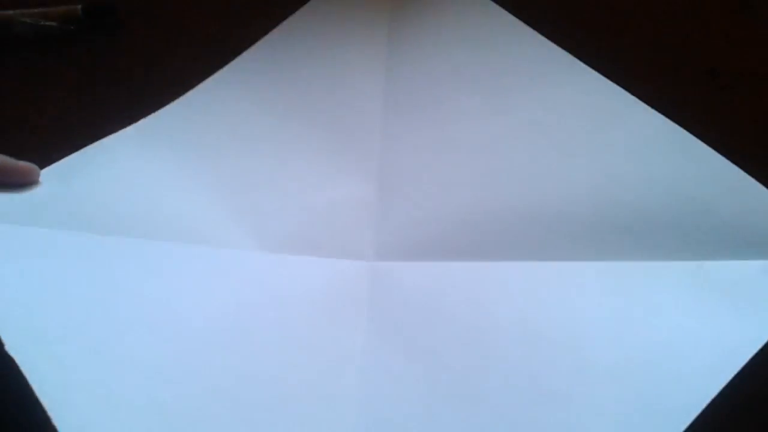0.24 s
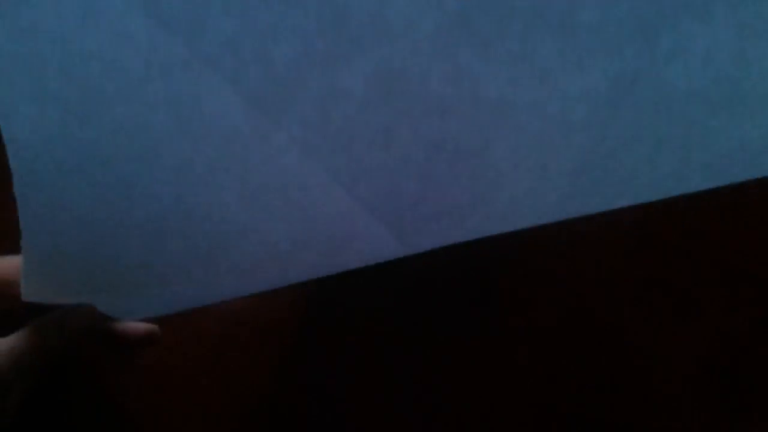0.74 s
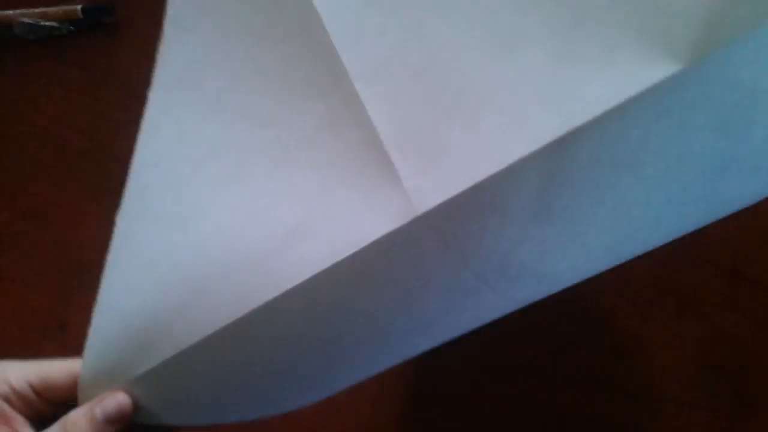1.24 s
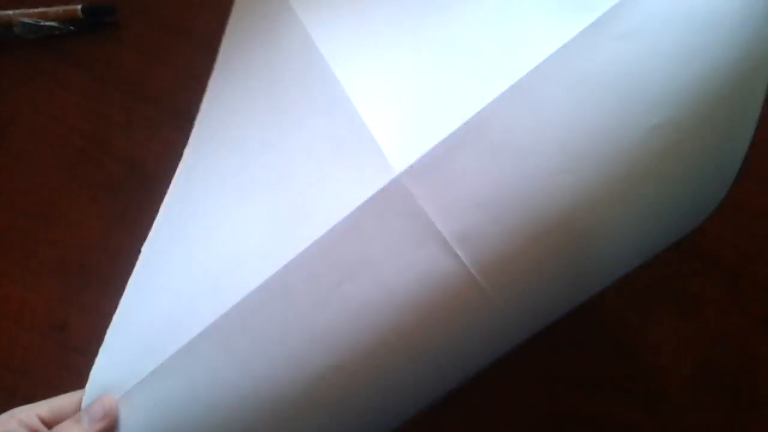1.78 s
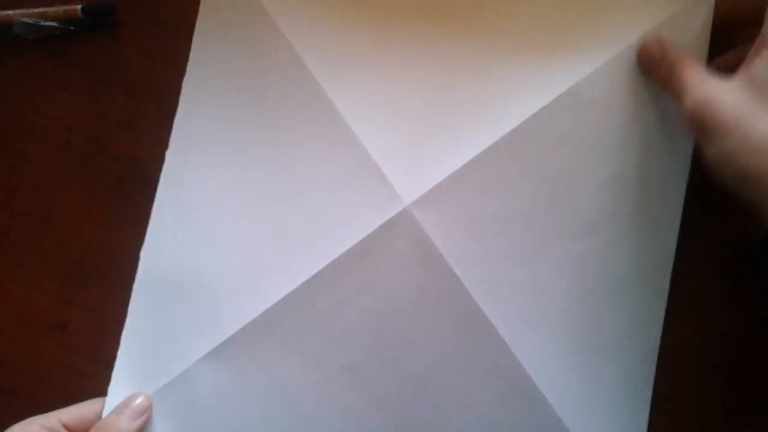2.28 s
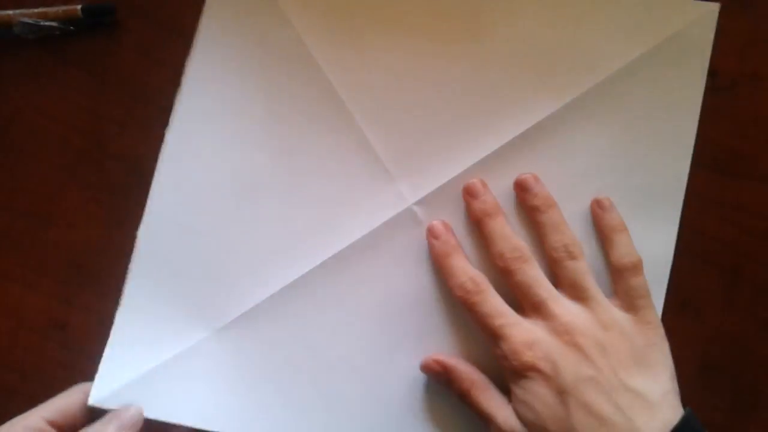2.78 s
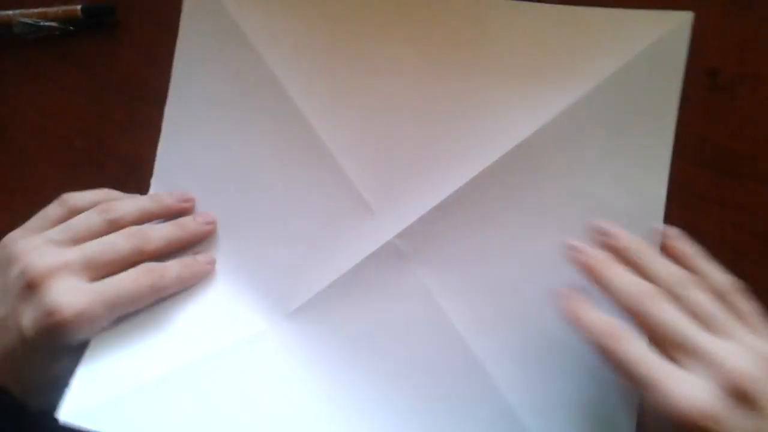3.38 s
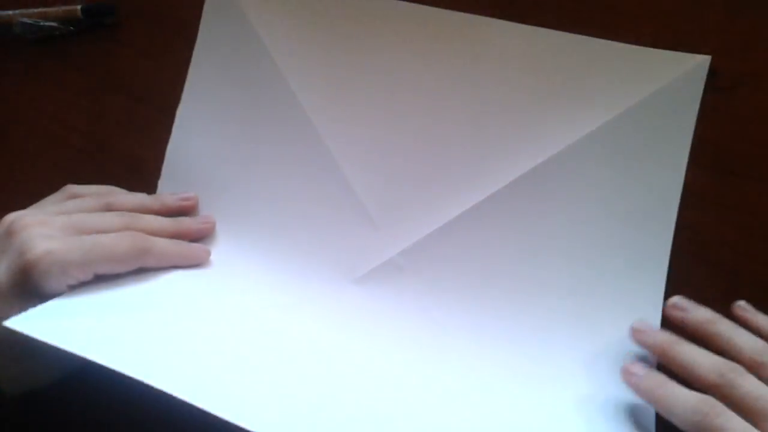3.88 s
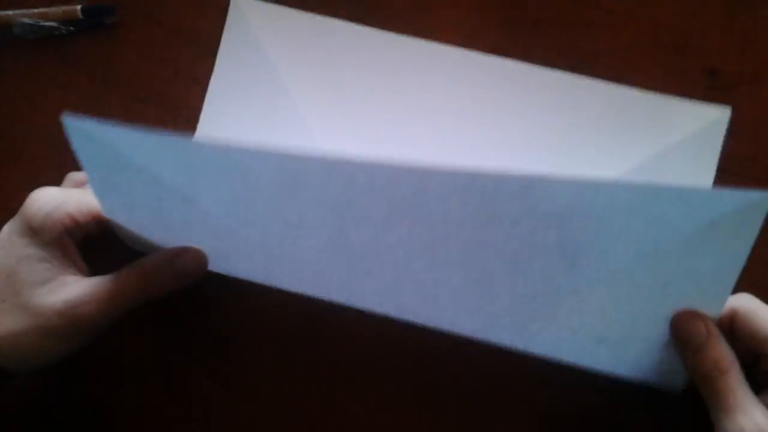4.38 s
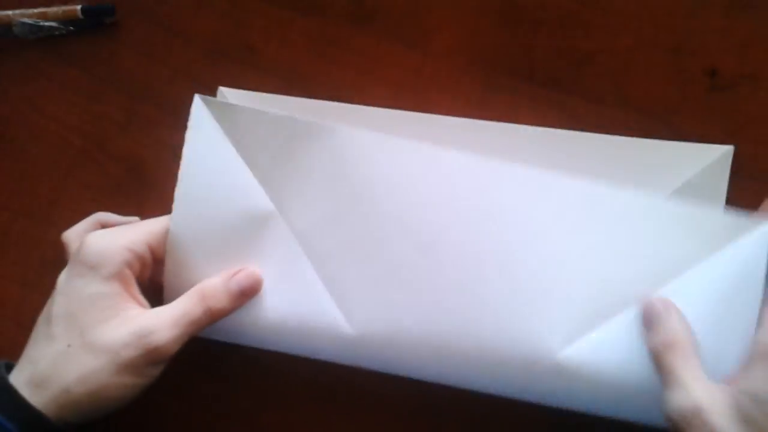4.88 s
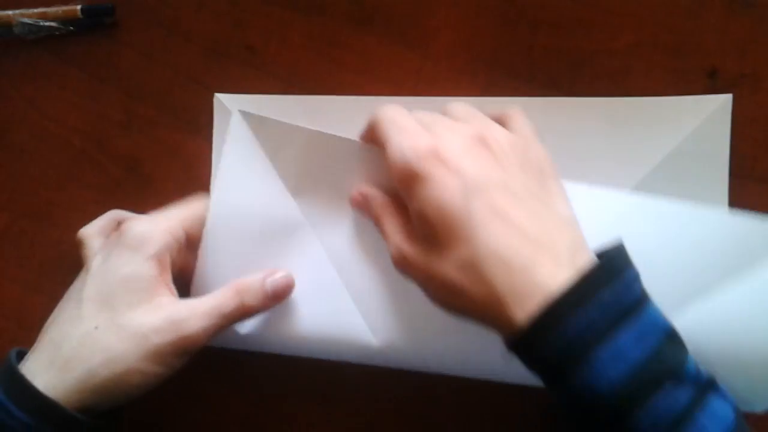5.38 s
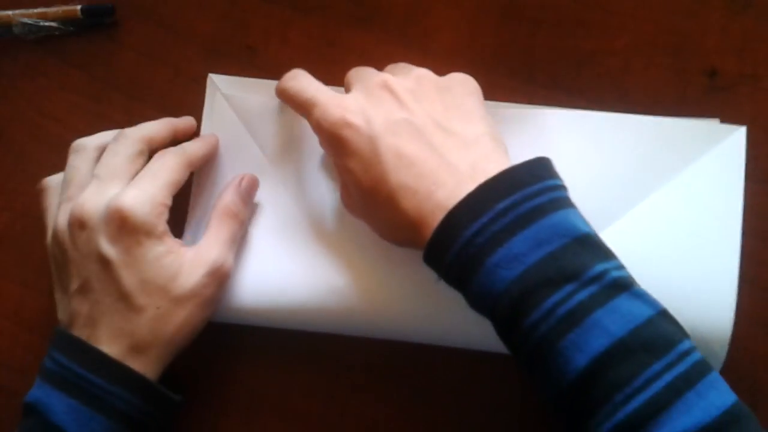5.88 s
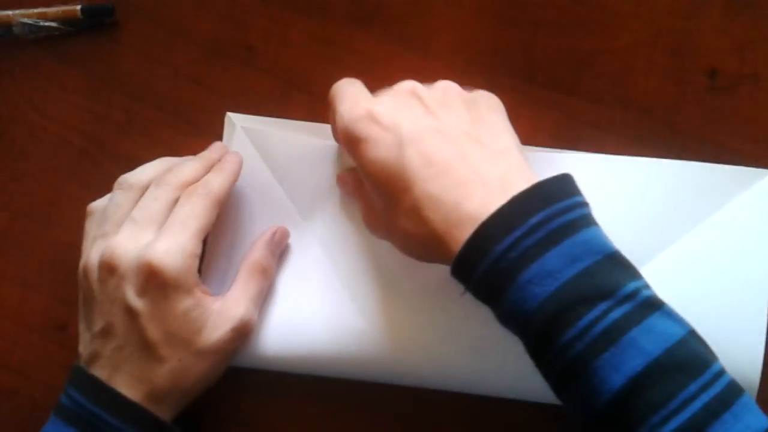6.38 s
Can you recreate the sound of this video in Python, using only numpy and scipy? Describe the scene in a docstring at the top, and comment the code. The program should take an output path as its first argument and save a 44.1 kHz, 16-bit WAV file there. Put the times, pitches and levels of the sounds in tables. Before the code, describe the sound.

In a small, quiet room, a faint mains hum and soft fan noise with a thin whine run throughout. Close to a small microphone, paper slides briefly at the start, with a light pop and rustle around 0.3-0.4 s, then faint brushing and a small tick at 1.5 s. At 1.7-1.95 s the turned sheet settles in a crackling flap with low puffs of air. After a soft slide near 2.2 s and a lull, crisp clicks come at 2.65 s and a sharp pop at 2.9 s, followed by smoothing hisses to 3.4 s. A gentle slide and tick pass around 3.9-4.0 s, a duller pop at 4.15 s. The fold swishes over at 4.7 s, bursting into dense hollow crackles at 4.85-5.0 s. Bright, hard creasing snaps strike at 5.42-5.48 s and 6.03 s, among strong rubbing strokes and fingertip hisses continuing to 6.6 s.

```python
"""A mains hum and a faint fan fill a small, quiet room, with the soft hiss of paper sliding under a hand.
A sheet is turned over, smoothed flat and folded on a wooden table, close to a small microphone.
Snaps are falling tones and clicks shaped by the paper panel; flaps are swelling bursts of clicks.
Slides are dense streams of tiny clicks, drags are narrow gliding hisses, and puffs are low swings of air."""
import sys
import numpy as np
from scipy import signal
from scipy.fft import rfft, irfft, next_fast_len
from scipy.io import wavfile
from scipy.ndimage import uniform_filter1d, map_coordinates

SR = 44100
rng = np.random.default_rng(int(sys.argv[2]) if len(sys.argv) > 2 else 0)


def log_audio(samples):
    """Write samples as a 16-bit WAV file to the path given in sys.argv[1]."""
    # one column per channel
    frames = np.atleast_2d(samples).T
    # limit to full scale, then quantise
    limited = np.clip(frames, -1, 1)
    pcm = np.round(limited * 32767).astype(np.int16)
    wavfile.write(sys.argv[1], SR, pcm)


N = 292806
T = np.arange(N) / SR  # time in seconds
MS = T * 1000  # time in milliseconds

SNAP_RISE_MS = 0.55
FLAP_SWELL_SHARE = 0.34  # part of a flap's listed length spent swelling; the rest sets its fade
FLAP_LOW_SHARE = 0.59  # low corner of a flap, as a share of its resonance
FLAP_CRACKLE_DB, FLAP_CRACKLES_PER_S = -1.5, 600  # separate crackles that stand out of a flap's rustle
STROKE_ROUNDNESS = 1.35  # 1 gives a pointed stroke, 2 a bell
RUSTLE_PER_PRESS = 2.25  # dB of rustle that the hand damps for each dB of pressure
# light brushing between the strokes: louder once the fold lays paper on paper, silent while the sheet lies still
BRUSH_OPEN_DB, BRUSH_FOLDED_DB, BRUSH_WANDER_DB = -62, -57.5, 1.5
FOLDED_S = 4.48
STILL_FROM_S, STILL_TO_S = 2.05, 2.61
DRAG_WIDTH_SHARE = 0.19  # width of a drag's first filter, as a share of its pitch
TABLE_ECHO_MS, TABLE_ECHO_SCATTER_MS, TABLE_ECHO_DB = 1.9, 0.17, -9.5  # the tabletop mirrors each snap


def undb(db):
    """Turn decibels into a gain."""
    return 10 ** (np.asarray(db) / 20)


def unit(x):
    """Scale a signal to an rms level of 1."""
    return x / np.sqrt(np.mean(x ** 2))


def walk(rate):
    """Wander at random: levels held for 1 / rate seconds, smoothed twice and scaled to rms 1."""
    hold = max(int(SR / rate), 2)
    steps = np.repeat(rng.standard_normal(N // hold + 1), hold)
    smooth = uniform_filter1d(uniform_filter1d(steps, hold), hold)
    return unit(smooth[:N])


def colour(x, points):
    """Filter a sound with a gain that runs through (Hz, dB) points, without any sound ahead of its cause."""
    size = 2 * next_fast_len(len(x))
    hz, db = np.transpose(points)
    bins_hz = np.maximum(np.arange(size // 2 + 1) * SR / size, 1)
    gain = undb(np.interp(np.log(bins_hz), np.log(hz), db))
    # folding the cepstrum onto positive times makes the filter causal
    cepstrum = irfft(np.log(gain))
    cepstrum[1:size // 2] *= 2
    cepstrum[size // 2 + 1:] = 0
    response = np.exp(rfft(cepstrum))
    return irfft(rfft(x, size) * response)[:len(x)]


def even(x, width_hz=500):
    """Level out the broad humps in the spectrum of a burst, so that it excites all pitches alike."""
    power = uniform_filter1d(np.abs(rfft(x, SR)) ** 2, size=int(width_hz))  # one bin per Hz
    hz = np.arange(50, 9000, 50)
    return colour(x, np.column_stack([hz, -10 * np.log10(power[hz] / power[hz].mean())]))


def add(out, s, x):
    """Mix x into out from time s, in seconds."""
    i = int(s * SR)
    out[i:i + len(x)] += x[:len(out) - i]


def swell(ms, rise_ms, fade_ms):
    """Rise in a straight line, then fade exponentially."""
    rise = np.minimum(ms / max(rise_ms, .1), 1)
    return rise * np.exp(-np.maximum(ms - rise_ms, 0) / max(fade_ms, .5))


def grains(count, rate, spread_db):
    """Tiny slips of fibres: random clicks, about `rate` a second, a few much larger than the rest."""
    size = undb(spread_db * np.minimum(rng.exponential(size=count), 5))
    sign = rng.choice([-1., 1.], count)
    return unit(sign * size * (rng.random(count) < rate / SR))


def background(waver=0.028, whine_drift=0.93):
    """Mains harmonics hum with a slight waver; a fan adds soft air noise and a thin, unsteady whine."""
    # colour of the fan's air noise: (pitch_hz, gain_db)
    fan_colour = [(20, -51.5), (35, -31.5), (55, -12), (90, -3), (125, 0), (160, -1.5), (220, 3),
                  (330, 0.5), (700, -2.5), (1200, -3.5), (2000, -9), (3500, -12), (6500, -14.5),
                  (8000, -47.5)]
    fan_db = -60  # rms level of the air noise
    # steady tones of the mains hum: (pitch_hz, about the rms level_db)
    hum_tones = [(100, -76), (120, -73.5), (200, -71.5), (300, -72.5), (400, -74), (500.3, -57),
                 (600.3, -60.5), (700, -75), (800, -76.5)]
    # whining tones of the fan: (pitch_hz, rms level_db)
    whine_tones = [(1136, -69.5), (1378, -71.5), (1674, -78)]
    out = undb(fan_db) * unit(colour(rng.standard_normal(N), fan_colour))
    for hz, db in hum_tones:
        level = np.sqrt(2) * undb(db) * (1 + waver * walk(3.5))
        out += level * np.sin(2 * np.pi * (hz * T + rng.random()))
    for hz, db in whine_tones:
        out += np.sqrt(2) * undb(db) * np.sin(2 * np.pi * hz * T + whine_drift * walk(22))
    return out


def room(x, wet_db=-10.0, t60_s=0.3, treble_t60_s=0.18, gap_s=0.0051, split_hz=2500):
    """Near walls answer after a few milliseconds; the treble dies a little sooner."""
    t = T[:SR // 2]
    echoes = grains(len(t), 12000, 2.3) * (t > gap_s)
    low = signal.sosfilt(signal.butter(2, split_hz, fs=SR, output="sos"), echoes)
    high = signal.sosfilt(signal.butter(2, split_hz, "high", fs=SR, output="sos"), echoes)
    # subtracting keeps the two bands from cancelling where they meet
    tail = even(low * 1e-3 ** (t / t60_s) - high * 1e-3 ** (t / treble_t60_s), width_hz=250)
    return x + undb(wet_db) * signal.fftconvolve(x, tail / np.linalg.norm(tail))[:N]


def puffs():
    """Air pushed out from under the moving sheet: a soft swing or two of pressure as the sheet settles."""
    # (middle_s, level_db, pitch_hz, length_ms)
    air_pushes = [(1.692, -42.5, 85, 4.2), (1.809, -47, 100, 6.8), (1.755, -55, 89.5, 6),
                  (1.91, -56, 70.4, 7.1), (2.034, -56, 68, 6.2), (5.744, -49.5, 117, 10)]
    out = np.zeros(N)
    for s, db, hz, length_ms in air_pushes:
        age_ms = (T - s) * 1000
        out -= undb(db) * np.sin(2 * np.pi * hz * (T - s)) * np.exp(-(age_ms / length_ms) ** 2 / 2)
    return out


def motion():
    """Sliding speed and pressure: every stroke speeds up and slows down, over a light, wandering brushing."""
    # a hand or the sheet slides: (time of greatest speed_s, level_db, speeding_up_s, slowing_down_s, pressure_db)
    strokes = [(0.0, -57, 0.057, 0.022, -1), (0.15, -74, 0.012, 0.013, -1), (0.36, -49.5, 0.087, 0.034, 2),
               (0.455, -55, 0.032, 0.025, -0.5), (0.78, -57.5, 0.047, 0.071, -1),
               (0.879, -56, 0.034, 0.043, 0.5), (1.19, -54.5, 0.064, 0.047, 0.5),
               (1.34, -62, 0.022, 0.024, -3), (1.765, -48.5, 0.12, 0.046, 2), (2.222, -52, 0.091, 0.032, 0),
               (2.655, -48, 0.044, 0.037, -1.5), (2.85, -55, 0.17, 0.13, 4), (2.995, -51.5, 0.018, 0.1, 5),
               (3.159, -49.5, 0.067, 0.079, 2.5), (3.281, -47, 0.024, 0.036, 0.5),
               (3.42, -56.5, 0.064, 0.017, -0.5), (3.917, -49.5, 0.12, 0.14, 0.6),
               (4.311, -55.5, 0.1, 0.093, 4.5), (4.701, -47, 0.13, 0.084, 0),
               (4.836, -51, 0.0082, 0.065, -1), (5.035, -46, 0.016, 0.045, -0.5),
               (5.1, -51, 0.031, 0.036, 0), (5.213, -51.5, 0.01, 0.032, -2),
               (5.305, -52.5, 0.021, 0.028, -2.5), (5.43, -45.5, 0.088, 0.082, -2.5),
               (5.62, -52.5, 0.041, 0.033, -2.5), (5.771, -48.5, 0.2, 0.075, 1.5),
               (5.928, -59, 0.071, 0.02, -5.5), (6.08, -45, 0.08, 0.095, 0),
               (6.273, -46, 0.034, 0.045, 1.5), (6.385, -51.5, 0.086, 0.089, 1.5),
               (6.49, -52.5, 0.033, 0.039, 1), (6.612, -49.5, 0.08, 0.043, 0.5)]
    moving = uniform_filter1d(1. * ((T < STILL_FROM_S) | (T > STILL_TO_S)), size=SR // 20)
    brush_db = uniform_filter1d(np.where(T < FOLDED_S, 1. * BRUSH_OPEN_DB, BRUSH_FOLDED_DB), size=SR // 5)
    power = (moving * undb(brush_db + BRUSH_WANDER_DB * walk(14))) ** 2
    pressed = np.zeros(N)
    for s, db, rise_s, fall_s, press_db in strokes:
        away = np.maximum((s - T) / rise_s, (T - s) / fall_s)
        near = away < 5
        stroke = (undb(db) * np.exp(-away[near] ** STROKE_ROUNDNESS)) ** 2
        power[near] += stroke
        pressed[near] += press_db * stroke
    # the stronger a stroke is at a moment, the more its pressure counts
    return np.sqrt(power), pressed / (power + 1e-18)


def sliding(hiss_db=-0.5, rustle_db=-3.0, catch_db=2.1, shift_db=-2.36, split_hz=4500):
    """Fibres catch and slip in a dense stream, as loud as the sliding is fast."""
    # colour of the fine hiss: (pitch_hz, gain_db)
    hiss_colour = [(300, -28), (1000, -23.5), (2000, 1.5), (3300, 5), (5300, 3.5), (6500, 2.5), (7300, -3),
                   (7900, -30.5)]
    # colour of the coarse rustle: (pitch_hz, gain_db)
    rustle_colour = [(120, -30), (300, -3), (600, -5.5), (900, 2.5), (1500, 3.5), (2200, -7), (4000, -22.5),
                     (8000, -20.5)]
    speed, press_db = motion()
    grip = undb(catch_db * walk(55))
    fine = unit(colour(grains(N, 14000, 2.6), hiss_colour))
    coarse = unit(colour(grains(N, 4000, 1.7), rustle_colour))
    # a pressing fingertip hisses brighter than a loose palm, and the patch of contact keeps shifting
    dull = signal.sosfiltfilt(signal.butter(2, split_hz, fs=SR, output="sos"), fine)
    bright = undb(0.72 * press_db + shift_db * walk(22.03))
    fine = unit(dull / bright + (fine - dull) * bright)
    # pressure also keeps the rest of the sheet from rustling
    rustle_gain = undb(rustle_db - RUSTLE_PER_PRESS * press_db)
    return grip * speed * (undb(hiss_db) * fine + rustle_gain * coarse)


def drags():
    """Skin sticks and slips on the sheet: a narrow hiss whose pitch glides as the fingertip rolls."""
    # (time of greatest speed_s, level_db, pitch_hz, half_length_s, glide_octaves)
    finger_drags = [(1.807, -42.5, 3840, 0.0095, -0.42), (2.831, -53, 3500, 0.052, -0.45),
                    (2.997, -55, 3330, 0.019, 0.1), (3.15, -56, 5070, 0.056, 0.17),
                    (3.797, -60, 3460, 0.051, 0.0024), (6.276, -50.5, 5330, 0.023, 0.1),
                    (6.39, -52, 5360, 0.042, 0.15), (6.615, -53, 4540, 0.014, -0.028)]
    out, slips = np.zeros(N), grains(N, 14000, 1.3)
    for s, db, hz, half_s, octaves in finger_drags:
        hiss = signal.lfilter(*signal.iirpeak(hz, 1 / DRAG_WIDTH_SHARE, fs=SR), slips)
        hiss = signal.lfilter(*signal.iirpeak(hz, 1, fs=SR), hiss)
        along = (T - s) / half_s
        # reading the hiss faster or slower bends its pitch
        read_at = np.cumsum(2 ** (octaves * np.tanh(along) / 2))
        hiss = map_coordinates(hiss, [read_at], order=1, mode="mirror")
        out += undb(db) * unit(hiss) * np.exp(-along ** 2 / 2)
    return out


def radiate(push, db, low_hz, high_hz, panel_hz, panel_db, steepness=2.9, width=0.087, leak_db=-30):
    """Panel size sets the lowest pitch and the resonance, the softness of the contact the highest pitch."""
    # colour of the whole sheet: (pitch_hz, gain_db)
    sheet_colour = [(30, -35.5), (130, 1.5), (300, 1), (700, -0.5), (1500, -0.5), (3000, -1), (5500, 0),
                    (6700, -5.5), (7900, -22.5)]
    hz = np.geomspace(30, 9000, num=200)
    sheet_hz, sheet_db = np.transpose(sheet_colour)
    band = 1 / np.sqrt((1 + (low_hz / hz) ** steepness) * (1 + (hz / high_hz) ** 4))
    resonance_db = panel_db / (1 + (np.log(hz / panel_hz) / width) ** 2 / 2)
    # the rest of the sheet answers faintly at every pitch
    band_db = 20 * np.log10(np.hypot(band, undb(leak_db)))
    shape_db = np.interp(np.log(hz), np.log(sheet_hz), sheet_db) + band_db + resonance_db
    sound = colour(push, np.column_stack([hz, shape_db]))
    # the level is that of the whole energy spread over 10 ms
    return undb(db) * sound / np.sqrt(np.sum(sound ** 2) / (SR / 100))


def flaps():
    """The sheet flaps, crumples or lands: many small buckles and contacts swell quickly and die away."""
    # (start_s, level_db, panel_resonance_hz, high_corner_hz, length_ms)
    flap_events = [(0.295, -41, 790, 1280, 95), (1.794, -46.5, 800, 1100, 39), (1.83, -39, 1040, 1400, 26),
                   (1.856, -30.5, 1080, 2500, 14), (1.889, -40, 1150, 3600, 12),
                   (1.917, -44, 1110, 1190, 10), (1.942, -44, 1060, 1000, 25),
                   (2.653, -38.5, 2310, 3880, 30), (2.895, -45, 1500, 3800, 25),
                   (3.235, -45, 1210, 2400, 50), (3.422, -44, 940, 2480, 36), (4.37, -50.5, 1010, 1890, 21),
                   (4.641, -44.5, 1300, 8000, 29), (4.837, -37.5, 1100, 1700, 29),
                   (4.862, -34, 1010, 2700, 30), (4.895, -40.5, 704, 2510, 26),
                   (4.919, -39.5, 960, 5340, 26), (4.96, -35, 1000, 1660, 32),
                   (5.16, -39.5, 940, 1210, 13.5), (5.429, -38, 2900, 5470, 42),
                   (5.43, -46.5, 695, 1800, 15), (5.647, -37.5, 1200, 1440, 47),
                   (6.04, -43, 1200, 1690, 44)]
    out, ms = np.zeros(N), MS[:SR // 4]
    for s, db, panel_hz, high_hz, length_ms in flap_events:
        rise_ms = FLAP_SWELL_SHARE * length_ms
        rustle = grains(len(ms), 14000, 0.55)
        contacts = rustle + undb(FLAP_CRACKLE_DB) * grains(len(ms), FLAP_CRACKLES_PER_S, 1.5)
        push = even(contacts * swell(ms, rise_ms, length_ms - rise_ms))
        low_hz = FLAP_LOW_SHARE * panel_hz
        add(out, s, radiate(push, db, low_hz, high_hz, panel_hz, panel_db=11.5, width=0.31))
    return out


def off_table(x):
    """The wood under the lifted sheet returns each snap at once and colours it; each panel has its own height."""
    lag_ms = TABLE_ECHO_MS + TABLE_ECHO_SCATTER_MS * rng.standard_normal()
    lag = max(int(lag_ms / 1000 * SR), 1)
    echo = undb(TABLE_ECHO_DB)
    return (x + echo * np.pad(x, (lag, 0))[:len(x)]) / np.hypot(1, echo)


def snaps(ripple=4.5, glide_ms=0.776, start_hz=7000, bend_hz=900):
    """A panel pops through; bending waves arrive treble first, then ripple between its creases."""
    # the sheet buckles:
    # (start_s, level_db, low_corner_hz, high_corner_hz, panel_resonance_hz, resonance_height_db, ring_ms)
    buckles = [(0.2955, -50, 650, 1800, 950, 11, 3.4), (0.3701, -39.5, 480, 1770, 740, 12, 3.9),
               (1.5, -44, 3000, 3500, 3200, 12, 2.2), (1.501, -43, 360, 1690, 410, 8, 3.1),
               (1.813, -41.5, 2870, 3400, 3070, 15, 2.9), (1.859, -35, 1100, 3300, 1700, 4, 6.2),
               (1.865, -28.5, 900, 2300, 1870, 8, 3.4), (1.875, -34.5, 330, 1900, 1090, 5, 3.4),
               (1.944, -45, 900, 1390, 1250, 16, 7), (2.6155, -50.5, 1900, 3200, 2700, 5, 2.6),
               (2.621, -43.5, 1100, 2200, 2000, 1, 3.4), (2.6303, -34, 1500, 2500, 2400, 13, 6.7),
               (2.6585, -40, 1700, 4000, 2600, -6, 4.4), (2.671, -45.5, 1900, 4000, 2800, 10, 1.8),
               (2.8884, -29.5, 1030, 4400, 1320, 7, 2.5), (2.9755, -42, 2000, 3500, 3000, 5, 0.31),
               (2.988, -49, 1800, 6550, 3000, -1, 2), (3.221, -45, 1000, 4530, 1300, 3, 8.4),
               (3.8445, -52.5, 1100, 3520, 2000, 7, 0.8), (3.9733, -35, 1900, 5450, 3200, 1.5, 3.3),
               (4.1425, -38, 555, 1190, 840, 10.5, 19), (4.839, -43, 1000, 1690, 1450, 11, 4),
               (4.8668, -34, 400, 3600, 1210, 11, 3.6), (4.8942, -29, 330, 8500, 950, -3, 5.3),
               (4.9022, -32.5, 450, 3800, 2700, 8, 4.6), (4.9105, -36, 450, 3000, 800, 6, 5.4),
               (4.9195, -37, 600, 4500, 1300, 3, 3.3), (4.9265, -36.5, 600, 4960, 1300, 5, 5.8),
               (4.9576, -34.5, 900, 1590, 1300, 10, 4), (4.9635, -36.5, 350, 3400, 1050, 7.5, 5.9),
               (4.976, -44.5, 900, 1800, 1240, 7, 3.6), (4.996, -44.5, 900, 2000, 1500, 7, 4.4),
               (5.1556, -42, 700, 1290, 834, 12, 4.6), (5.4209, -36, 280, 2980, 1400, 13, 8.3),
               (5.423, -23, 1400, 4970, 3140, 1, 0.76), (5.4254, -28, 900, 6500, 4700, 1, 7.5),
               (5.4687, -25.5, 1700, 5500, 2600, 6, 1.3), (5.4718, -29, 600, 3540, 1045, 3.5, 2.6),
               (5.478, -34, 1900, 3400, 2600, 7, 3.6), (6.0348, -29, 1490, 6000, 5450, 6, 2.5),
               (6.0352, -27, 870, 2400, 955, 9, 6.4), (6.086, -45, 800, 2200, 1090, 5, 3.5)]
    out, ms = np.zeros(N), MS[:SR // 10]
    for s, db, low_hz, high_hz, panel_hz, panel_db, ring_ms in buckles:
        waves = grains(len(ms), 15000, 0.24) * swell(ms, SNAP_RISE_MS, ring_ms)
        age_ms = np.maximum(ms - SNAP_RISE_MS / 2, 0)
        # the pop is a tone that falls from start_hz towards bend_hz while it fades
        fade = np.exp(-age_ms / glide_ms)
        hz = bend_hz + (start_hz - bend_hz) * fade
        pop = np.sin(2 * np.pi * np.cumsum(hz * (age_ms > 0)) / SR) * fade
        push = even(pop / np.linalg.norm(pop) + ripple * waves / np.linalg.norm(waves))
        snap = radiate(push, db, low_hz, high_hz, panel_hz, panel_db, steepness=6.7)
        add(out, s, off_table(snap))
    return out


def scene():
    """Paper and hands sound in the room; the puffs, hum and fan are added without its echoes."""
    paper = snaps() + flaps() + sliding() + drags()
    return (room(paper) + puffs() + background())[None]


def record(dry):
    """The small recorder keeps no high treble: a steep filter cuts it."""
    top_hz = 8000
    return signal.sosfilt(signal.ellip(8, .2, 70, top_hz, fs=SR, output="sos"), dry)


dry = scene()
out = record(dry)
log_audio(out)
```